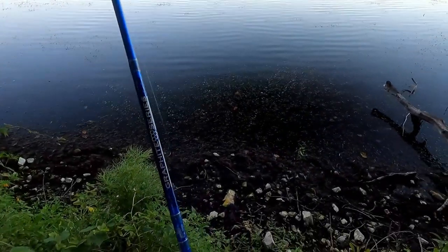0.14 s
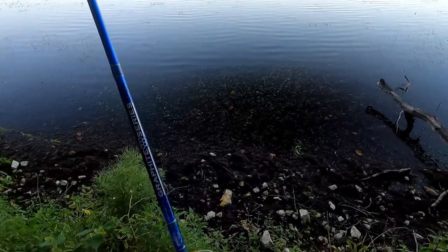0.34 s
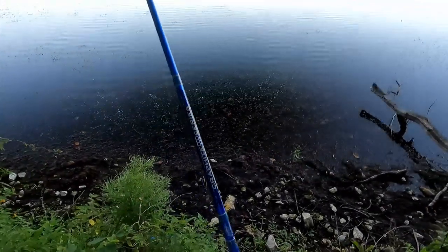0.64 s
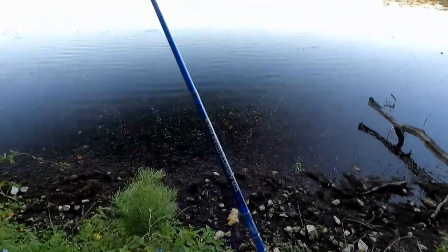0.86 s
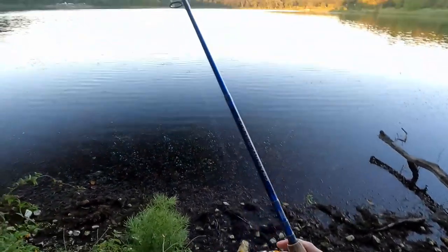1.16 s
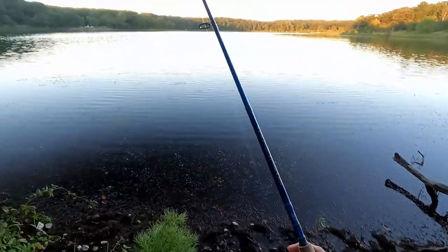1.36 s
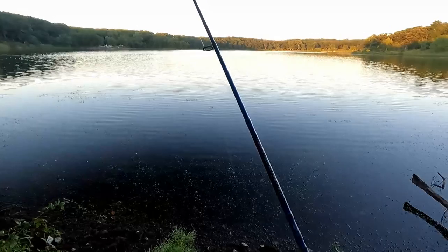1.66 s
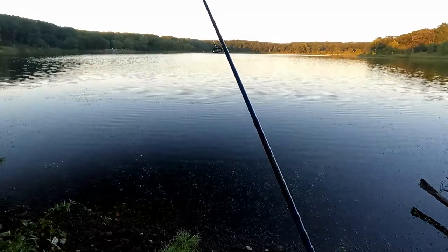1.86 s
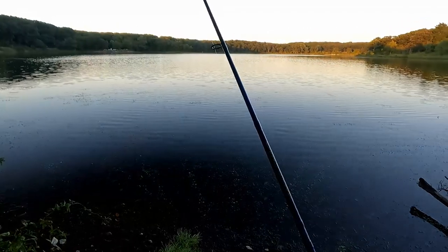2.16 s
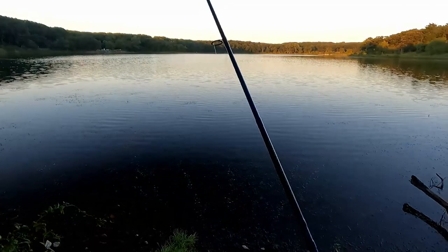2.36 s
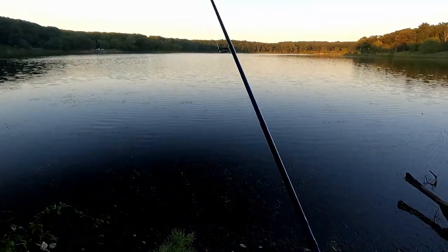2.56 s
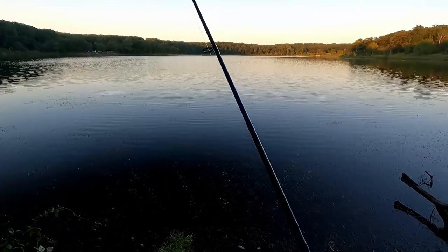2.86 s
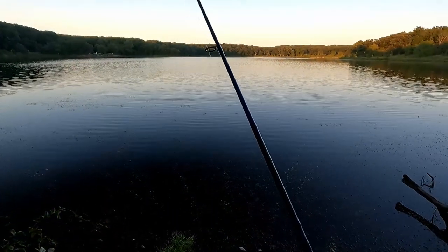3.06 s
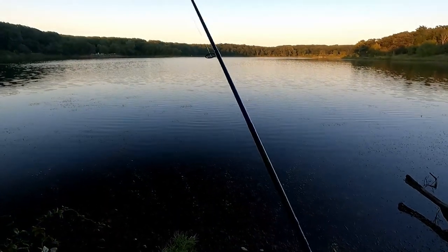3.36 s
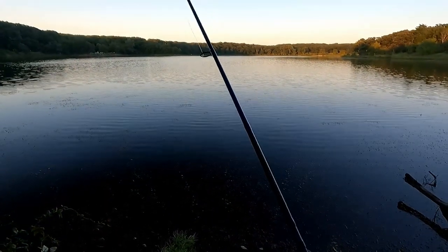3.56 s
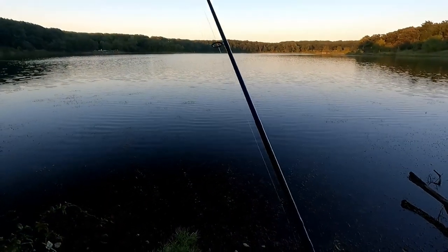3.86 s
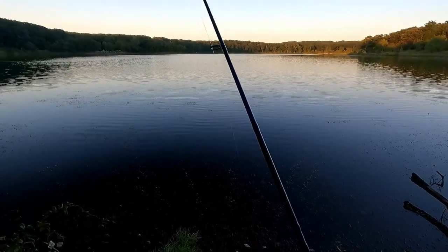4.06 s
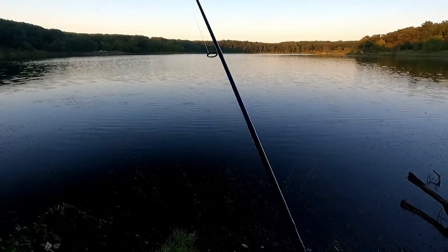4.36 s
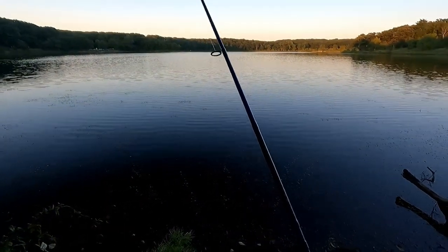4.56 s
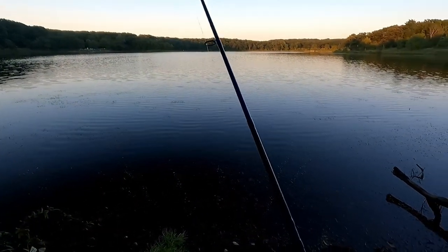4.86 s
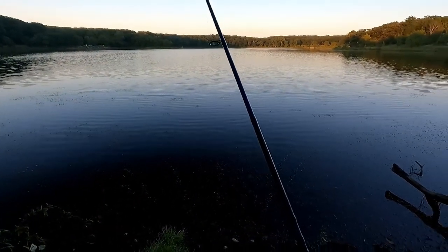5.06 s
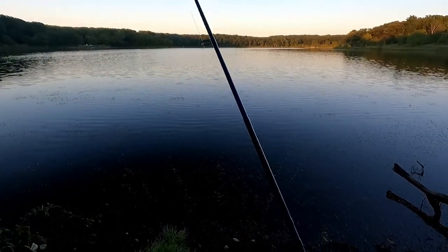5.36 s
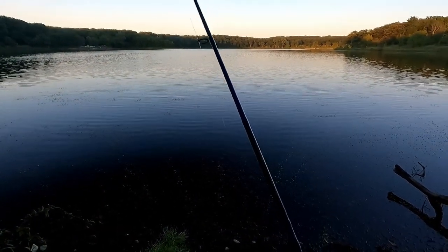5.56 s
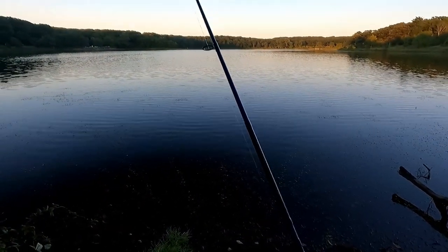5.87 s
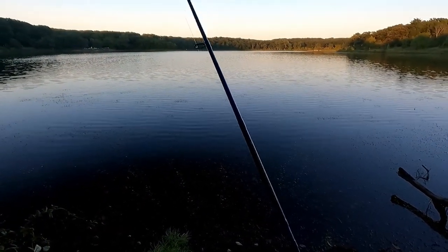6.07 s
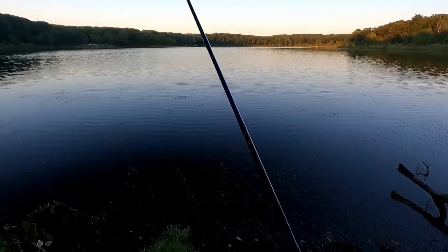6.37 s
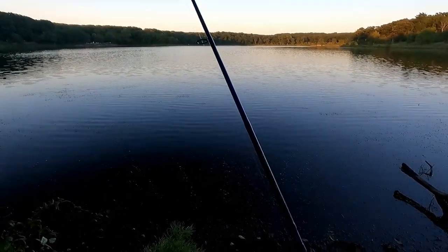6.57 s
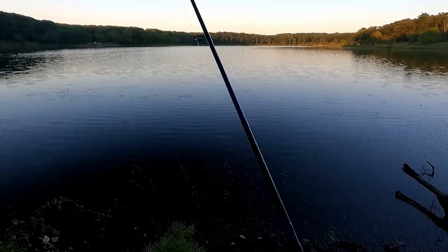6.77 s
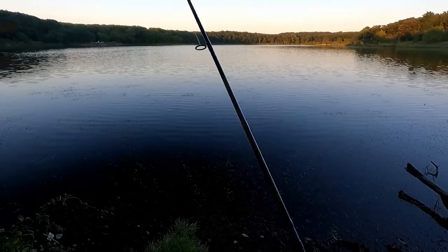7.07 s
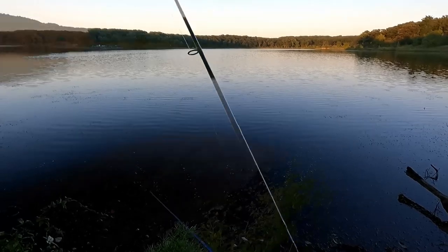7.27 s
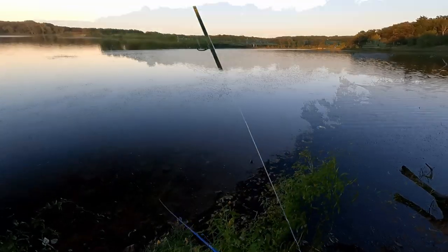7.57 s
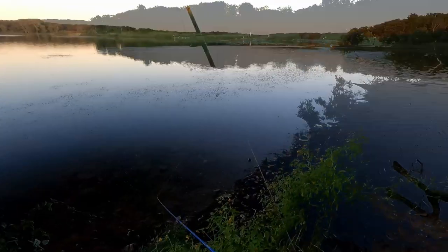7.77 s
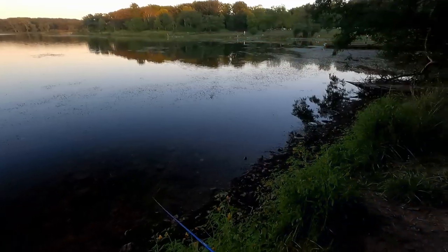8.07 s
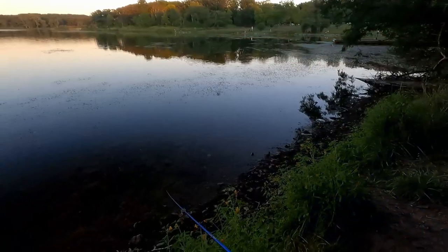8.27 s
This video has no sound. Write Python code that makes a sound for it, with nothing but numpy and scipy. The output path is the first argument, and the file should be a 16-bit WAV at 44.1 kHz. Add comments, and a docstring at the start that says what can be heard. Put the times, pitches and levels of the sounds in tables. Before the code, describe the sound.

Crickets trill steadily close by over a low distant rumble at a lakeshore, with fishing rod clicks, katydid buzzes and a sudden change of place near the end.

```python
"""A lake at dusk: two crickets trill close on the left, a third chirps, a katydid ticks and buzzes.
Filtered noise makes the rumble, tyre-like hiss and far choruses; sine tones make hums, crickets and calls.
A rod clicks and rustles with short rings and bursts of noise; a far water bird calls.
Near the end the listening place changes at once: the near insects are gone,
and a farther cricket, built from the same wing strokes, trills over a broad low drone."""
import sys
import numpy as np
from scipy import signal
from scipy.fft import rfft, irfft, next_fast_len
from scipy.io import wavfile
from scipy.ndimage import map_coordinates

SR = 44100
rng = np.random.default_rng(int(sys.argv[2]) if len(sys.argv) > 2 else 0)


def store_wav(level_fs):
    """Save 16-bit WAV to argv[1]."""
    pcm = np.round(np.clip(np.atleast_2d(level_fs), -1, 1) * 32767)
    wavfile.write(sys.argv[1], SR, pcm.T.astype(np.int16))


N = 371322
T = np.arange(N) / SR  # time of every sample, s
MOVE_S = 7.571  # when the listening place changes


def amp(db):
    """Turn decibels into a plain multiplier."""
    return 10 ** (np.asarray(db) / 20)


def unit(x):
    """Scale a sound to an rms (average strength) of 1."""
    return x / np.sqrt(np.mean(x ** 2) + 1e-20)


def along(points, hz):
    """Read a curve of (pitch_hz, value) points, spaced by the logarithm of pitch."""
    point_hz, value = np.transpose(points)
    return np.interp(np.log(hz + 1), np.log(point_hz + 1), value)


def curves(rows, at=T, **outside):
    """Read every column after the first at the given places."""
    position, *columns = np.transpose(rows)
    return [np.interp(at, position, column, **outside) for column in columns]


def wobble(rate):
    """A smooth random curve with rate random points a second."""
    return map_coordinates(rng.standard_normal(int(N * rate / SR) + 4), [T * rate])


def filtered(x, response):
    """Change the strength and phase of each frequency in x."""
    size = next_fast_len(N + 8192)
    return irfft(rfft(x, size) * response(np.fft.rfftfreq(size, 1 / SR)), size)[..., :N]


def peak(hz, width_hz):
    """A resonance applied twice; width_hz is the width of one pass."""
    return lambda f: (1j * f * width_hz / (hz * hz - f * f + 1j * f * width_hz)) ** 2


def moved():
    """0 at the first listening place, 1 at the second, crossing in 8 ms."""
    return np.clip((T - MOVE_S) / .008 + .5, 0, 1)


def places(levels_db, drift_db):
    """One level for each listening place, drifting slowly."""
    first, second = levels_db
    return first + (second - first) * moved() + drift_db * wobble(1.525)


def placed(x, pan_db, lead, wet_db, t60):
    """A source to one side, lead seconds sooner on the left, plus its scatter off grass and reeds."""
    sides = np.array([[.5], [-.5]])
    direct = filtered(x, lambda f: amp(pan_db * sides) * np.exp(2j * np.pi * f * lead * sides))
    t = np.arange(SR // 4) / SR
    tail = rng.standard_normal((2, len(t))) * amp(-60 * t / t60)  # falls 60 dB in t60 seconds
    tail = tail / np.linalg.norm(tail[0])
    return direct + amp(wet_db) * signal.fftconvolve(x[None], tail, axes=1)[:, :N]


def aside(noises, pan_db, lead, wet_db):
    """A noisy source to one side: one direct noise, and two more as scatter, unlike left and right."""
    return placed(noises[0], pan_db, lead, wet_db=-60, t60=.1) + amp(wet_db) * noises[1:]


def swell(rate, depth_db):
    """Many singers nearly in step: a beat, rate times a second, that drifts in speed."""
    return amp(depth_db * np.cos(2 * np.pi * (rate * T + .5 * wobble(2.2))))


# How alike left and right are in the far sound: pitch_hz, likeness (1 = the same)
ALIKE = [(60, 1.0), (130, 1.0), (290, 0.99), (640, 0.78), (1410, 0.81), (3100, 0.72), (6820, 0.68),
         (15000, 0.08)]
# How far the far sound leans left: pitch_hz, left_over_right_db
LEAN = [(60, 0), (130, -1), (290, 1.5), (640, 1), (1410, 0), (3100, 2.5), (6820, 6.5), (15000, 14.5)]


def spread(points):
    """Wide stereo noise of rms 1, coloured by the points; mixing two noises sets the likeness."""
    def mix(f):
        turn = np.arccos(np.clip(along(ALIKE, f), -1, 1)) / 2
        return amp(along(points, f)) * np.array([np.cos(turn), np.sin(turn)])

    mid, side = filtered(rng.standard_normal((2, N)), mix)
    pair = np.array([mid + side, mid - side])
    return unit(filtered(pair, lambda f: amp(np.outer([.5, -.5], along(LEAN, f)))))


# Colour of the deep rumble: pitch_hz, relative_level_db
DEEP = [(11, -27), (18, -10), (64, 2), (130, -7.5), (170, -21), (290, -120)]
# Colour of the fuller part above it: pitch_hz, relative_level_db
BODY = [(59, -48), (100, -0.5), (189, -6.5), (220, -9), (275, -13), (350, -18), (480, -26.5), (620, -34),
        (1060, -120)]


def rumble():
    """Two bands of low noise from all around, each unsteady in level."""
    deep_db = places((-39, -36.5), drift_db=0.26) + 0.62 * wobble(4.6)
    body_db = places((-43.5, -47), drift_db=0.03) + 0.7 * wobble(5)
    return amp(deep_db) * spread(DEEP) + amp(body_db) * spread(BODY)


# Colour of the soft hiss: pitch_hz, relative_level_db
HISS = [(240, -38.5), (400, -2), (688, -3.5), (850, -12), (1100, -31), (1870, -120)]
# Level of the soft hiss before it wavers: time_s, level_db
HISS_LEVEL = [(0, -60.5), (.8, -63), (2.25, -55), (2.7, -58), (3.35, -55), (4.5, -58.5), (7.5, -60.5),
              (8.42, -63)]
# Two colours of tyre-like hiss, duller then brighter: pitch_hz, relative_level_db
TYRES = [
    [(500, -46), (850, -5), (1090, -0.5), (1330, -6), (1940, -11), (2200, -34.5), (2860, -60), (4840, -120)],
    [(500, -33), (850, -9), (1160, -0.5), (1360, -3.5), (1540, -7.5), (2200, -16), (2860, -50),
     (4840, -120)],
]
# Mix of the two colours: time_s, brighter_share (0 to 1, of the power)
BRIGHT = [(0, 0.05), (1, 0.14), (1.6, 0.99), (6, 0.96), (6.6, 0.7), (7.5, 0.51), (8.42, 0.07)]


def tyre_hiss():
    """Soft noise plus tyre-like noise that shifts in colour; both lean left at the second place."""
    bright = np.clip(curves(BRIGHT)[0], 0, 1)
    tyres = np.sqrt(1 - bright) * spread(TYRES[0]) + np.sqrt(bright) * spread(TYRES[1])
    tyres_db = places((-57.5, -60.5), drift_db=0.0) + 1.44 * wobble(6.3)
    soft_db = curves(HISS_LEVEL)[0] + 1.1 * wobble(5.8)
    both = amp(soft_db) * spread(HISS) + amp(tyres_db) * tyres
    lean_db = 6.5 * moved()  # left over right
    return both * amp(np.outer([.5, -.5], lean_db))


# Colour of the high airy noise: pitch_hz, relative_level_db
AIR = [(1800, -120), (2000, 0), (3200, -7.5), (4500, -7.5), (6500, -14), (8000, 0), (8500, -23),
       (15500, -35)]
# Its level: time_s, level_db
AIR_LEVEL = [(0, -70), (1.05, -67), (2.2, -72.5), (3.4, -76), (4.5, -75), (7.5, -77), (7.6, -69),
             (8.42, -71.5)]


def air():
    """High, airy noise from all around."""
    return amp(curves(AIR_LEVEL)[0]) * spread(AIR)


# Colour of katydid wings, far and near: pitch_hz, relative_level_db
WING = [(7500, -60), (8600, -30.5), (10000, -18), (10900, -13.5), (11500, -4), (12000, 3.5), (12500, -0.5),
        (13000, -7.5), (13700, -18), (14300, -8), (14900, -9.5), (15500, -18.5)]
# Level of the far katydids: time_s, level_db
FAR_KATYDIDS = [(0, -79), (1.56, -72), (7.57, -73), (7.6, -75.5), (7.95, -74.5), (8.2, -80.5)]


def far_katydids():
    """Many wings blur into high noise that throbs at two speeds."""
    beat = swell(40, depth_db=2.5) * swell(21.0, depth_db=1.5)
    return amp(curves(FAR_KATYDIDS)[0]) * unit(beat * spread(WING))


def side_rumble():
    """A faint low rumble, different left and right: two separate noises through a low resonance."""
    return amp(-67.5) * unit(filtered(rng.standard_normal((2, N)), peak(40, 70)))


# Far engine tones: pitch_hz, level_db (both waver), start_s, end_s
HUMS = [(107, -45, .3, 3.4), (146, -47, -.2, .8), (135, -48, 1, 1.8), (289, -52, -.2, 1.3),
        (267, -54, .3, 3), (177, -54, 2.4, 3.8), (218, -54, .2, 1.6), (219, -50, 4.3, 7.6),
        (79, -37, 7.52, 8.6)]


def hums():
    """Far engines: slightly unsteady low sine tones that fade in and out."""
    out = np.zeros(N)
    for hz, db, start, end in HUMS:
        fade = np.clip(np.minimum(T - start, end - T) / .12, 0, 1)
        tone = np.sin(2 * np.pi * hz * T + .9 * wobble(4))
        out += fade * amp(db + 1.5 * wobble(5)) * tone
    return out


# Level of the far trilling crowd: time_s, level_db
FAR_TRILL = [(0, -62), (.6, -62), (1, -60.5), (7.57, -75), (7.58, -70), (8.2, -65.5), (8.42, -71)]


def crowd(colour, rate, depth_db):
    """Three separate noises of one colour, throbbing together."""
    return unit(swell(rate, depth_db) * filtered(rng.standard_normal((3, N)), colour))


def choruses():
    """Far crowds of singers blur into throbbing bands of noise, each with its own stereo placing."""
    low = amp(places((-66.5, -63.5), drift_db=0.7)) * crowd(peak(2514, 408), rate=26.0, depth_db=1.0)
    high = amp(places((-63.5, -66), drift_db=1.14)) * crowd(peak(5585, 760), rate=21.0, depth_db=0.5)
    # no stroke rises above the top of its pitch arch, so the trill's colour is cut off steeply
    arches = lambda f: peak(7600, 900)(f) / (1 + (f / 7950) ** 60)
    trills = amp(curves(FAR_TRILL)[0]) * crowd(arches, rate=31, depth_db=2.0)
    # a narrow band with a deeper throb, only at the second place
    pulsing = amp(-67.5) * crowd(peak(2525, 330), rate=18.6, depth_db=2.5)
    out = aside(low, pan_db=-3.5, lead=-5.4e-5, wet_db=-4.5)
    out += aside(high, pan_db=-1.0, lead=4e-5, wet_db=-7)
    out += aside(trills, pan_db=2, lead=2e-5, wet_db=-7.5)
    return out + moved() * aside(pulsing, pan_db=3, lead=0, wet_db=-5)


def trill(pace, stroke, level_db):
    """A pure tone whose pitch follows the wing's speed on each stroke; no two strokes are quite alike."""
    at_start, per_second, slowing = pace  # strokes at 0 s, strokes a second, slowing per second
    cycles = at_start + per_second * T - slowing / 2 * T ** 2 + 0.012 * wobble(30)
    whole = np.round(cycles)
    hz, db = curves(stroke, cycles - whole)
    chance = rng.standard_normal((400, 2))[whole.astype(int)]  # one pair of draws a stroke
    tone = np.sin(2 * np.pi * np.cumsum(hz * (1 + 0.003 * chance[:, 0])) / SR)
    stroke_db = db + 0.4 * chance[:, 1] + 0.5 * wobble(150)
    return amp(level_db) * unit(tone * amp(stroke_db))


# One wing stroke of the higher cricket: part_of_stroke (-0.5 to 0.5), pitch_hz, relative_level_db
UPPER = [(-.35, 7250, -23), (-.3, 7300, -8.5), (-.12, 7700, -2.5), (0.029, 7760, -5), (.14, 7610, -3),
         (.2, 7317, -9), (.32, 6837, -15.5), (.37, 6680, -32)]
# The same for the lower cricket: part_of_stroke (-0.5 to 0.5), pitch_hz, relative_level_db
LOWER = [(-.35, 6350, -37), (-.28, 6600, -0.5), (-.18, 7100, 4), (0, 7430, -4.5), (.2, 6960, -0.5),
         (.33, 6460, -8), (.39, 6270, -40)]
# Level of the higher cricket: time_s, level_db
UPPER_LEVEL = [(0, -58), (.63, -58.5), (.9, -53), (1.6, -50.5), (4.2, -50), (4.8, -51), (7.1, -50),
               (7.6, -50.5)]


def near_trillers():
    """Two near crickets whose strokes slowly slip against each other."""
    upper = trill((-.27, 35.361, 0), UPPER, curves(UPPER_LEVEL)[0])
    lower = trill((-.435, 34.679, .0169), LOWER, -55.5 + 0.86 * wobble(3.014))
    upper = placed(upper, pan_db=8.0, lead=2.4e-5, wet_db=-13, t60=0.23)
    return upper + placed(lower, pan_db=6.5, lead=2.4e-5, wet_db=-8.5, t60=0.35)


# Times of the chirps: mark_s (8 ms after each chirp starts)
CHIRPS = [0.031, 0.57, 1.11, 1.62, 2.14, 2.69, 3.25, 3.8, 4.38, 5.001, 5.65, 6.23, 6.86, 7.481]


def chirper():
    """A third cricket: rough chirps of about nine quick strokes, each falling in pitch."""
    chirps, t = np.zeros(N + SR), np.arange(int(.125 * SR)) / SR
    arch = np.sin(np.pi * t / t[-1])
    for mark, (pace, tune) in zip(CHIRPS, rng.standard_normal((len(CHIRPS), 2))):
        stroke = t * 75 * (1 + .015 * pace) % 1  # about 75 strokes a second
        # pitch and level jump every 300 samples, which makes the chirp rough
        wander, size = np.repeat(rng.standard_normal((2, 20)), 300, axis=1)[:, :len(t)]
        hz = 6230 + 20 * tune + 20 * arch - 200 * stroke + 45 * wander
        tone = np.sin(2 * np.pi * np.cumsum(hz) / SR)
        loudness = amp(-55 + size) * arch ** .1 * np.sin(np.pi * stroke) ** 2
        chirps[round((mark - .008) * SR):][:len(t)] += loudness * tone
    return placed(chirps[:N], pan_db=4, lead=1e-5, wet_db=-9, t60=.1)


# Single katydid strokes: start_s
TICKS = [.102, .19, .269, 2.515, 2.609, 2.692, 6.156, 6.248, 6.328]
# Katydid buzzes: start_s, end_s
BUZZES = [(.3326, 1.485), (2.7284, 3.975), (6.38, 7.572)]
# A buzz stroke grows, then breaks off: part_of_stroke (0 to 1), relative_level_db
RASP = [(0, -2.5), (.08, -8.5), (.35, -12), (.5, -6.5), (.7, -1), (1, -1)]
# How each buzz swells: time_into_buzz_s, level_db
BUZZ_SWELL = [(0, -78), (.08, -63), (.28, -59.5), (1.3, -59.5)]


def katydid():
    """Three single strokes, then a buzz that swells and slows; uneven tooth strikes are rough noise."""
    effort = np.zeros(N)
    for start, end in BUZZES:
        into = T - start
        cycles = .32 + 38.15 * into - .52 / 2 * into ** 2  # 38.15 strokes a second, losing 0.52 each second
        stroke_db = curves(RASP, cycles % 1)[0]
        stop = np.clip((end - T) / .012, 0, 1)  # 12 ms fade
        strokes = unit(amp(stroke_db + 0.52 * wobble(40)))
        effort += amp(curves(BUZZ_SWELL, into, left=-200)[0]) * stop * strokes
    for start in TICKS:
        late = np.clip(T - start, 0, None)
        rise = np.clip(late / 0.0054, 0, 1)
        fall = np.exp(-(late / .016) ** 3) + 0.34 * np.exp(-late / 0.044)
        effort += amp(-57) * rise * fall
    teeth = rng.standard_normal((3, N)) * amp(1.2 * wobble(500))
    rasp = unit(filtered(teeth, lambda f: amp(along(WING, f))))
    return aside(effort * rasp, pan_db=16.5, lead=2.3e-5, wet_db=-6)


# Rod clicks, and two faint chirps near 3 kHz at 2.45 and 2.518 s:
# start_s, ring_level_db, ring_pitch_hz, crack_share (crack against ring)
CLICKS_AND_CHIRPS = [(.2005, -49, 4900, .6), (.2765, -33, 1950, 3.5), (.3488, -36.5, 1880, 3.3),
                     (.8385, -58, 4500, 3), (.884, -53, 2640, 3), (.9627, -51, 3000, 4),
                     (1.043, -56, 3500, 3), (1.1712, -49, 4400, 4), (1.188, -50, 4100, 1.5),
                     (2.45, -55, 3000, 1.5), (2.518, -54, 2980, 1.5), (2.985, -56, 3000, 1.5),
                     (5.46, -60, 4200, 3), (7.8463, -39, 1470, .2)]
# Rustle of cloth or line: time_s, level_db
RUSTLE = [(.82, -85), (.95, -64), (1.08, -72), (1.16, -58), (1.19, -55), (1.205, -65), (1.3, -86)]


def rod_and_faint_chirps():
    """Small plastic clicks and two faint chirps, each a short ring and a crack, and one noise rustle."""
    shorts, t = np.zeros(N + SR), np.arange(SR // 20) / SR
    for start, db, hz, share in CLICKS_AND_CHIRPS:
        burst = (t == 0) + .25 * rng.standard_normal(len(t)) * amp(-60 * t / .004)
        crack = filtered(burst, peak(3400, 5000))[:len(t)]
        ring = np.sin(2 * np.pi * hz * t) * amp(-60 * t / .009)  # falls 60 dB in 9 ms
        shorts[round(start * SR):][:len(t)] += amp(db) * (ring - share * crack)
    rustle = unit(filtered(rng.standard_normal(N) * amp(3.9 * wobble(200)), peak(4550, 3400)))
    rustle = amp(curves(RUSTLE, left=-200, right=-200)[0]) * rustle
    return placed(shorts[:N] + rustle, pan_db=0, lead=0, wet_db=-13, t60=.07)


def calls(rows, overtones):
    """Gliding voices: the pitch bends through three points under a rounded swell."""
    out = np.zeros(N)
    for start, length, first, middle, last, db in rows:
        u = np.clip((T - start) / length, 0, 1)  # progress through the call
        hz = first * (1 - u) + last * u + (4 * middle - 2 * first - 2 * last) * u * (1 - u)
        turns = 2 * np.pi * np.cumsum(hz) / SR
        voice = sum(amp(over_db) * np.sin(k * turns) for k, over_db in overtones)
        out += amp(db + 4.3 * wobble(60)) * np.sin(np.pi * u ** 1.36) ** 0.53 * voice
    return out


# Water bird: start_s, length_s, start_pitch_hz, middle_pitch_hz, end_pitch_hz, level_db (flickers)
HONKS = [(1.63, .09, 540, 640, 695, -63), (1.76, .11, 665, 685, 560, -62)]
# Tones of its voice: multiple_of_pitch, relative_level_db
THROAT = [(2, 9), (3, -5), (4, -1)]
# Hoots, a faint chirp, and at 1.705 s an overtone from the middle of the honk:
# start_s, length_s, start_pitch_hz, middle_pitch_hz, end_pitch_hz, level_db (flickers)
SINGLE_TONES = [(1.705, .055, 2260, 2330, 2250, -60), (2.24, .29, 690, 680, 600, -57),
                (3.2, .15, 620, 580, 540, -55), (3.43, .1, 740, 800, 770, -56),
                (5.04, .1, 3450, 3510, 3560, -77)]


def far_calls():
    """Far calls across the water: a honk built from overtones; hoots and a faint chirp of one tone each."""
    voices = calls(HONKS, THROAT) + calls(SINGLE_TONES, [(1, 0)])
    return placed(voices, pan_db=0, lead=0, wet_db=-10, t60=.15)


# Level of the farther cricket: time_s, level_db
DISTANT_LEVEL = [(7.57, -67), (8.2, -67.5), (8.3, -77), (8.42, -72)]


def distant_cricket():
    """The farther cricket of the second place, with the higher cricket's stroke and more scatter."""
    song = trill((.44, 35.7, 0), UPPER, curves(DISTANT_LEVEL)[0])
    return placed(song, pan_db=-1.0, lead=0, wet_db=-6, t60=0.2)


def drone():
    """A broad low engine drone at the second place: noise through a low resonance."""
    fade_in = np.clip((T - MOVE_S) / 0.035, 0, 1)
    noise = unit(filtered(rng.standard_normal(N), peak(79.6, 53)))
    return fade_in * amp(-35 + .6 * wobble(3.5)) * noise


def scene():
    """Add up all the sounds, swapping the near crickets for the farther one at the move."""
    background = rumble() + tyre_hiss() + air() + far_katydids() + side_rumble() + hums()
    near = (1 - moved()) * (near_trillers() + chirper())
    insects = choruses() + near + katydid() + moved() * distant_cricket()
    return background + insects + rod_and_faint_chirps() + far_calls() + drone()


def record(dry):
    """Keep only what lies below the band limit."""
    return filtered(dry, lambda hz: hz < 15762)


dry = scene()
out = record(dry)
store_wav(out)
```